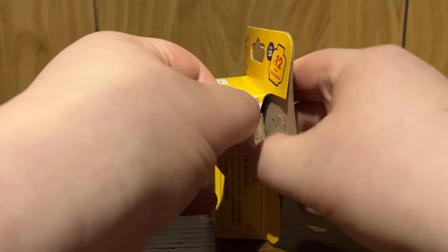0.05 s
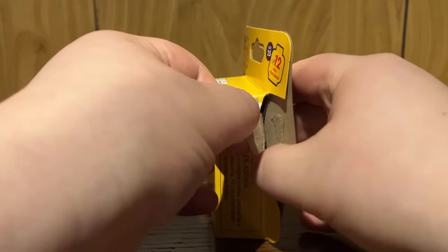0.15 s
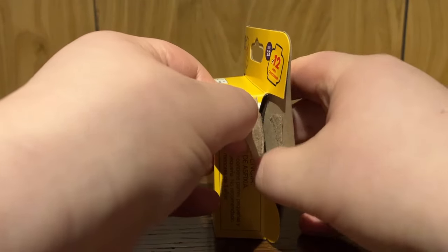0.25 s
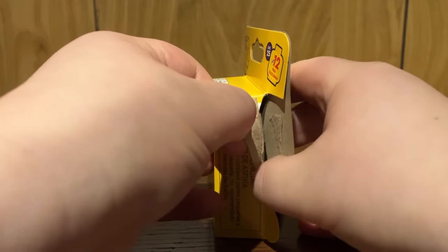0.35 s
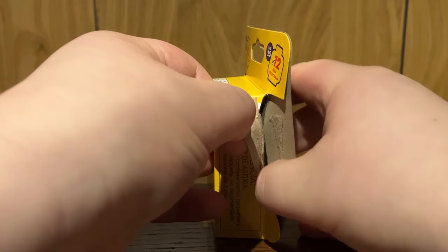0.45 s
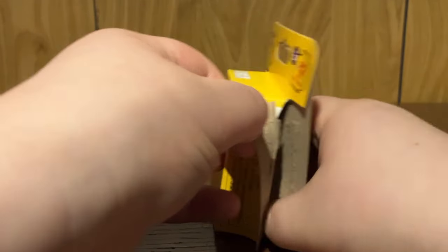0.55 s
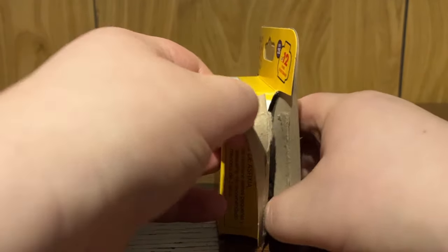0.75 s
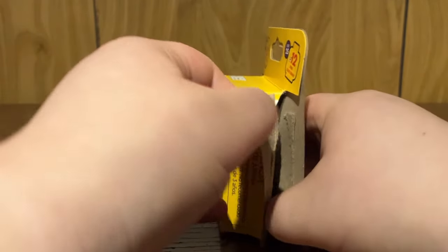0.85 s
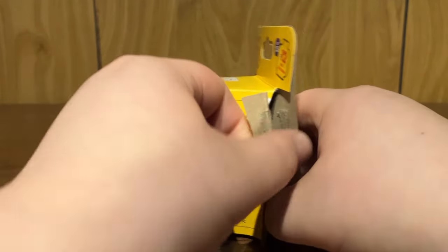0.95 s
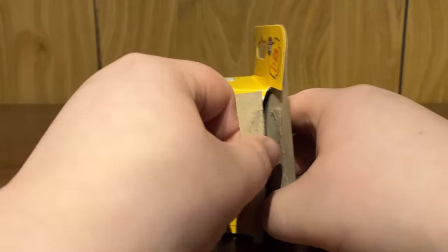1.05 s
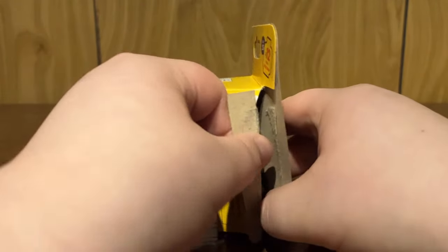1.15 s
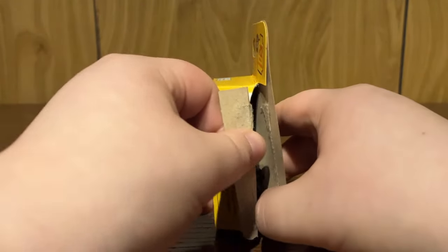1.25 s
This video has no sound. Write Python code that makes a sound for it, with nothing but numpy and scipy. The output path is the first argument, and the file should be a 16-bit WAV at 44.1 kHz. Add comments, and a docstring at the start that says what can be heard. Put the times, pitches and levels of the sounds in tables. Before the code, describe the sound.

A small cardboard box is torn open by hand, close to a stereo microphone. Short scratchy rips and clicks lead to one loud pop as the flap gives, then crinkling and soft finger bumps in a quiet room.

```python
"""First comes the scrape of card: hands tear open a small box close to a stereo microphone.
Each short pull makes the fibres hiss and the panels rustle, and some fibres snap with a click.
The glued flap gives way with one loud pop, then the loose panels buckle and crinkle.
Fingers bump softly against the hollow box, which rings briefly in a small, quiet room."""
import sys
import numpy as np
from scipy import signal
from scipy.fft import rfft, irfft, next_fast_len
from scipy.io import wavfile
from scipy.ndimage import uniform_filter1d, map_coordinates

SR = 44100
rng = np.random.default_rng(int(sys.argv[2]) if len(sys.argv) > 2 else 0)


def output_pcm(signal):
    """Save a mono or channel-first signal as 16-bit PCM at the path in sys.argv[1].

    Samples are clipped to [-1, 1] before scaling.
    """
    pcm = np.clip(np.atleast_2d(signal).T, -1, 1) * 32767
    wavfile.write(sys.argv[1], SR, np.round(pcm).astype(np.int16))


N = 57330
OPEN_S = 0.62  # from here on the flap is loose and the fibres sound thinner


def amp(db):
    """Turn decibels into a gain."""
    return 10 ** (np.asarray(db) / 20)


def unit(x):
    """Scale a sound to an average (rms) level of 1."""
    return x / np.sqrt(np.mean(x ** 2) + 1e-20)


def along(points, hz):
    """Read between a table's points on a log frequency scale."""
    freqs, values = np.transpose(points)
    return np.interp(np.log(hz + 1), np.log(freqs + 1), values)


def filtered(x, response):
    """Multiply each frequency in x by response(hz)."""
    size = x.shape[-1]
    padded = next_fast_len(size + 8192)
    return irfft(rfft(x, padded) * response(np.fft.rfftfreq(padded, 1 / SR)), padded)[..., :size]


def coloured(x, spectrum):
    """Give x a tone colour, at an average level of 1."""
    return unit(filtered(x, lambda hz: amp(along(spectrum, hz))))


def stereo_noise(size, spread=0.57):
    """Noise shared by left and right, plus some that each side hears alone."""
    return rng.standard_normal(size) + spread * rng.standard_normal((2, size))


def swell(age):
    """A burst that peaks at age 1 and dies quickly."""
    age = np.maximum(age, 0)
    return age * np.exp((1 - age * age) / 2)


def swing(start, pitch_hz, cycles):
    """Loudness and tone of card swinging briefly, strongest after `cycles` swings."""
    turns = (np.arange(N) / SR - start) * pitch_hz
    return swell(turns / cycles), np.sin(2 * np.pi * turns)


def jolts(rows, cycles):
    """Clean blows that move a whole panel at once."""
    return sum(amp(db) * np.prod(swing(start, hz, cycles), axis=0) for start, db, hz in rows)


# tone colour of the background (frequency [Hz], level [dB])
BACKGROUND_COLOUR = [(20, -15), (70, 7.5), (200, -0.5), (400, -15), (800, -9), (1700, -8), (3000, -22),
                     (15000, -30)]

def background():
    """A faint, steady, low noise."""
    return amp(-66.5) * coloured(stereo_noise(N, spread=0.26), BACKGROUND_COLOUR)


# how long the room echoes (frequency [Hz], time to fade by 60 dB [s])
ECHO_FADE = [(150, 0.23), (500, 0.36), (1400, 0.3), (4000, 0.11), (12000, 0.14)]
# how much sound feeds the echo (frequency [Hz], level [dB])
ECHO_FEED = [(100, -22), (500, -9.5), (1400, -20.5), (4000, -6.5), (12000, -16.5)]

def room_echo(x):
    """The room adds a short blurred tail, nearly the same on both sides in the bass."""
    hz, t, noise = signal.stft(rng.standard_normal((2, SR // 3)), SR, nperseg=256)
    fading = noise * amp(-60 * t / along(ECHO_FADE, hz)[:, None]) * (1 - np.exp(-t / 0.00038))
    mid, side = fading[0], fading[1] * np.clip(hz / 1600, 0, 1)[:, None]
    tail = signal.istft(np.array([mid + side, mid - side]), SR, nperseg=256)[1]
    sent = filtered(x.mean(axis=0), lambda f: amp(along(ECHO_FEED, f)))
    return signal.fftconvolve(sent[None], tail / np.linalg.norm(tail[0]), axes=1)[:, :N]


# how far the left wave runs ahead of the right (frequency [Hz], phase [rad])
LEFT_LEAD = [(0, 0), (1400, 0.5), (3300, 2.5), (4100, 1.21), (5300, 4.5), (6700, 2), (9200, -4),
             (11500, -6), (13700, -9.5), (15400, -11.5)]
# how much louder the left side is (frequency [Hz], level [dB])
LEFT_BOOST = [(70, 2), (200, -1.5), (650, 4), (1200, 2.5), (2400, 2), (4400, 2.5), (15000, -0.5)]

def microphone_pair(x):
    """The direct sound reaches each side with its own timing and level."""
    half = np.array([[.5], [-.5]])
    def response(hz):
        lead = np.interp(hz, *np.transpose(LEFT_LEAD))
        return amp(half * along(LEFT_BOOST, hz)) * np.exp(1j * half * lead)
    return filtered(x, response)


# the notes the box rings with (pitch [Hz], level [dB], time to fade by 60 dB [s])
BOX_NOTES = [(320, -2.5, 0.093), (706, 2.5, 0.028), (840, 4.5, 0.11), (924, -2, 0.17), (1152, -3.5, 0.063),
             (1477, -2.5, 0.029), (1581, 1.5, 0.15)]

def hollow_box(x, ring_db=-4.5):
    """The hollow box rings on after each jolt."""
    def response(f):
        total = 0
        for hz, db, fade_s in BOX_NOTES:
            width_hz = np.log(1000) / (np.pi * fade_s)
            damping = 1j * f * width_hz
            total += amp(db) * damping / (hz * hz - f * f + damping)
        return total
    return x + amp(ring_db) * filtered(x, response)


# fingers meeting the box (time [s], level [dB], pitch [Hz])
BUMPS = [(.228, -47, 107), (.454, -34.5, 68), (.632, -55.5, 68.5), (.78, -51, 145), (.975, -48, 120),
         (1.028, -41, 136), (1.131, -48, 410)]

def finger_bumps():
    """Fingers nudge a panel into a soft, low thud."""
    return jolts(BUMPS, cycles=1.1)


# panels buckling (time [s], level [dB], pitch [Hz])
PANEL_FLIPS = [(0.0952, -34, 1480), (.2000, -38.5, 860), (.3217, -36, 843), (.3557, -37, 815),
               (0.3574, -35.5, 325), (0.3863, -32.5, 830), (.4165, -33.5, 1000), (0.418, -33.5, 333),
               (.4790, -19, 812), (0.4851, -19.5, 1620), (0.511, -28.5, 1560), (0.5185, -21, 1510),
               (0.5335, -18.5, 1520), (0.5706, -19, 2640), (0.5729, -24.5, 1850), (.5888, -20.5, 1170),
               (0.7068, -35, 1650), (0.8312, -32.5, 976), (0.899, -33, 1600), (0.902, -39, 880),
               (0.9353, -38.5, 1190), (0.9499, -34.5, 1420), (1.0152, -44, 870), (1.023, -36.5, 865),
               (1.1321, -47, 690)]

def buckling_panels(roughness=0.26, crumple_gain=0.38, crumple_s=0.0047, width_octaves=0.58):
    """A panel flips over with a rough edge, then its crease crumbles on around the same pitch."""
    out, t = np.zeros(N), np.arange(SR // 20) / SR
    crunch = coloured(rng.standard_normal(N),
                      [(150, -52), (600, -2), (2800, -7), (4500, -18), (15000, -28)])
    for start, db, pitch_hz in PANEL_FLIPS:
        flip, tone = swing(start, pitch_hz, cycles=1.036)
        out += amp(db) * flip * (tone + roughness * crunch)
        def near_pitch(hz):
            return np.exp(-.5 * (np.log2((hz + 1) / pitch_hz) / width_octaves) ** 2)
        slips = unit(filtered(rng.standard_normal(len(t)), near_pitch))
        shape = np.minimum(t * pitch_hz / 2, 1) * np.exp(-t / crumple_s)
        out[round(start * SR):][:len(t)] += amp(db) * crumple_gain * shape * slips
    return out


def tiny_slips(spectrum, per_s, clumps_per_s, clump_db):
    """Thousands of tiny slips in the card come in random clumps."""
    slips = (rng.random(N) < per_s / SR) * np.tanh(stereo_noise(N))
    wobble = map_coordinates(rng.standard_normal(N // 8), [np.arange(N) * clumps_per_s / SR], mode="wrap")
    return coloured(slips * amp(clump_db * np.tanh(wobble)), spectrum)


# pulls on the card; a rise is the change in level from start to end
# (start [s], end [s], hiss [dB], rustle [dB], rumble [dB], hiss rise [dB], rustle rise [dB])
HAND_PULLS = [(-.01, 0.064, -33.5, -40, -51.5, -3, -6.5), (0.198, .251, -37.5, -43, -61, 3, 3),
              (0.255, 0.277, -39.5, -48, -54.5, -3, -15), (0.317, 0.338, -44, -45, -53, 14.5, 0),
              (0.337, 0.456, -43, -48.5, -51, 11, 15), (0.441, 0.452, -25, -29.5, -60, 8, 15),
              (0.457, 0.466, -41, -35.5, -29, 9, -23), (0.473, 0.488, -32, -34, -46.5, -7, 15),
              (0.487, 0.552, -40.5, -41.5, -54.5, -12, 11.5), (0.553, 0.614, -55, -48.5, -55, -4, -2),
              (0.622, 0.675, -54.5, -60, -72, 3, 1), (0.682, 0.77, -47.5, -66.5, -72.5, -1, 0),
              (0.759, 0.814, -43.5, -56.5, -70, 9, -13), (0.809, 0.973, -46, -55.5, -65, -2, 7),
              (0.969, 1.011, -61, -57.5, -52, 10, -18), (1.017, 1.062, -51.5, -53.5, -54, -8.5, -17.5),
              (1.065, 1.099, -68.5, -59.5, -59.5, -3, -15), (1.123, 1.208, -65, -59, -74, -9, -3),
              (1.219, 1.29, -66, -57.5, -83, -6, -1)]
# tone colours of fibres, panels and hands (frequency [Hz], level [dB])
TIGHT_FIBRES = [(600, -37), (2000, -2.5), (3200, -8), (5000, -2.5), (7000, 0.5), (8300, -6), (10200, 1.5),
                (13000, -4), (15500, -6.5)]
LOOSE_FIBRES = [(600, -8.5), (2000, -0.5), (3200, -7), (5000, -4), (6500, -1.5), (9500, -2), (11200, 1.5),
                (12400, 2), (14000, 0), (15500, -2.5)]
TIGHT_PANELS = [(120, -37), (250, 0), (350, -1), (520, -12.5), (750, -5.5), (950, 2), (1550, 1),
                (2200, -4.5), (3300, -6.5), (6000, -26), (12000, -54)]
LOOSE_PANELS = [(120, -36), (220, -6.5), (310, 0.5), (420, -1), (560, -2), (800, -6.5), (1550, -4),
                (2200, -14.5), (3300, -21), (6000, -25), (12000, -63)]
HAND_RUMBLE = [(20, -39), (45, -10.5), (75, -2), (110, -7.5), (150, 3), (210, -12.5), (400, -26),
               (1500, -58)]

def tearing_pulls(fade_in_s=0.0099, fade_out_s=0.0036):
    """Each pull makes the fibres hiss, the panels rustle and the hands rumble."""
    t = np.arange(N) / SR
    hiss, rustle, rumble = np.zeros((3, N))
    for start, end, hiss_db, rustle_db, rumble_db, hiss_rise, rustle_rise in HAND_PULLS:
        fade_in = np.clip((t - start) / fade_in_s + .5, 0, 1)
        shape = fade_in * np.exp(-np.maximum(t - end, 0) / fade_out_s)
        progress = np.clip((t - start) / (end - start), 0, 1) - .5
        # overlapping pulls add their power
        hiss = np.hypot(hiss, shape * amp(hiss_db + hiss_rise * progress))
        rustle = np.hypot(rustle, shape * amp(rustle_db + rustle_rise * progress))
        rumble = np.hypot(rumble, shape * amp(rumble_db))
    tight_hiss = tiny_slips(TIGHT_FIBRES, per_s=9000, clumps_per_s=510, clump_db=3.8)
    loose_hiss = tiny_slips(LOOSE_FIBRES, per_s=9000, clumps_per_s=370, clump_db=5.5)
    tight_rustle = tiny_slips(TIGHT_PANELS, per_s=2500, clumps_per_s=300, clump_db=-0.5)
    loose_rustle = tiny_slips(LOOSE_PANELS, per_s=2500, clumps_per_s=150, clump_db=4.5)
    hands = coloured(stereo_noise(N, spread=0.25), HAND_RUMBLE)
    return (hiss * np.where(t < OPEN_S, tight_hiss, loose_hiss)
            + rustle * np.where(t < OPEN_S, tight_rustle, loose_rustle)
            + uniform_filter1d(rumble, size=900) * hands)


# fibres breaking (time [s], level [dB], pitch [Hz])
FIBRE_BREAKS = [(0.0311, -20.5, 10800), (0.0568, -19.5, 7780), (.0952, -17, 9700), (0.1618, -38, 6700),
                (0.1732, -35, 9500), (0.202, -22.5, 10100), (0.2072, -19.5, 10000), (0.217, -26.5, 10600),
                (0.2274, -11, 10400), (0.274, -31, 7200), (0.3013, -26, 7200), (.3130, -38, 7200),
                (0.4017, -27, 12200), (0.4088, -28, 11800), (0.416, -24, 11100), (.4297, -23, 11600),
                (0.4423, -14.5, 11600), (0.4467, -20, 11600), (0.452, -11, 8070), (.4742, -24, 5940),
                (0.5706, -25.5, 6100), (0.589, -33, 10700), (0.6861, -34.5, 12600), (0.708, -25, 13500),
                (0.7485, -31.5, 11700), (.7690, -29, 12100), (0.7821, -28, 11900), (0.7949, -23.5, 11900),
                (0.845, -17.5, 12200), (0.8724, -21.5, 11900), (0.911, -26.5, 12000),
                (0.9188, -23.5, 11900)]
# a snap's tone colour, and its thinning on the loose flap (frequency [Hz], level [dB])
SNAP_COLOUR = [(200, -44), (1000, -13), (2500, -13), (4500, -8), (6800, 1.5), (9000, -7), (12000, 0.5),
               (16000, -3)]
SNAP_THINNING = [(7000, -1.5), (12000, 0.5)]

def snapping_fibres(rise_s=0.0004, ring_db=6.5, width_hz=900, fray_s=0.0024):
    """A bundle of fibres breaks in about a millisecond and rings briefly at its own pitch."""
    out, t = np.zeros((2, N + SR)), np.arange(SR // 50) / SR
    for start, db, pitch_hz in FIBRE_BREAKS:
        loose = start > OPEN_S
        def colour(hz):
            ring = ring_db / (1 + ((hz - pitch_hz) / width_hz) ** 2)
            return amp(along(SNAP_COLOUR, hz) + loose * along(SNAP_THINNING, hz) + ring)
        fray = 0.39 if loose else 0.24  # stray fibres part just after the snap
        shape = np.maximum(swell(t / rise_s), fray * np.exp(-t / fray_s))
        noise = filtered(stereo_noise(len(t)), colour)
        burst = unit(shape * noise) * np.sqrt(np.mean(shape ** 2))
        out[:, round(start * SR):][:, :len(t)] += amp(db) * burst
    return out[:, :N]


# panels jolted as the glue lets go (time [s], level [dB], pitch [Hz])
FLAP_JOLTS = [(.4515, -12, 3720), (0.4517, -11, 2080), (.4524, -3.5, 956), (.4536, -10, 347),
              (.4561, -14, 666), (0.4592, -10.5, 1370)]

def flap_pop():
    """The glued flap gives way, panel after panel, so fast that it makes one pop."""
    return jolts(FLAP_JOLTS, cycles=0.92)


def scene():
    """The card, its room and the quiet background."""
    card = hollow_box(tearing_pulls() + buckling_panels() + flap_pop() + finger_bumps())
    card = card + snapping_fibres()
    return background() + room_echo(card) + microphone_pair(card)


def record(dry):
    """The recorder cuts the deepest bass, rounds off the loudest peak and drops the highest treble."""
    low_cut_hz, ceiling, top_hz = 59, 0.95, 15900
    trimmed = signal.sosfilt(signal.butter(2, low_cut_hz, "highpass", fs=SR, output="sos"), dry)
    rounded = trimmed / (1 + (trimmed / ceiling) ** 8) ** (1 / 8)
    return filtered(rounded, lambda hz: 1 / np.sqrt(1 + (hz / top_hz) ** 240))


dry = scene()
out = record(dry)
output_pcm(out)
```